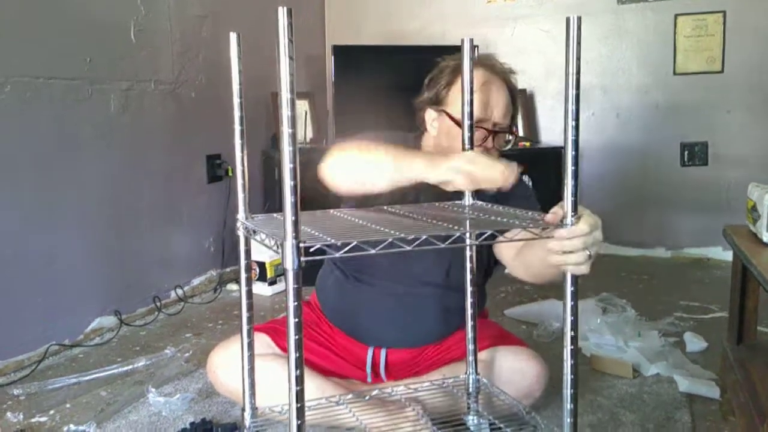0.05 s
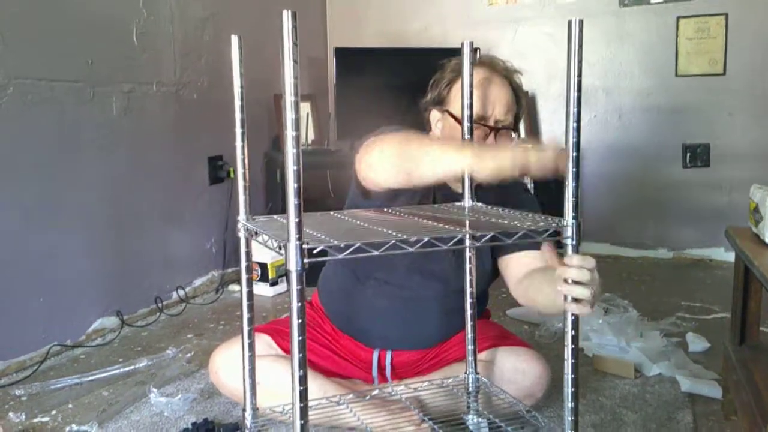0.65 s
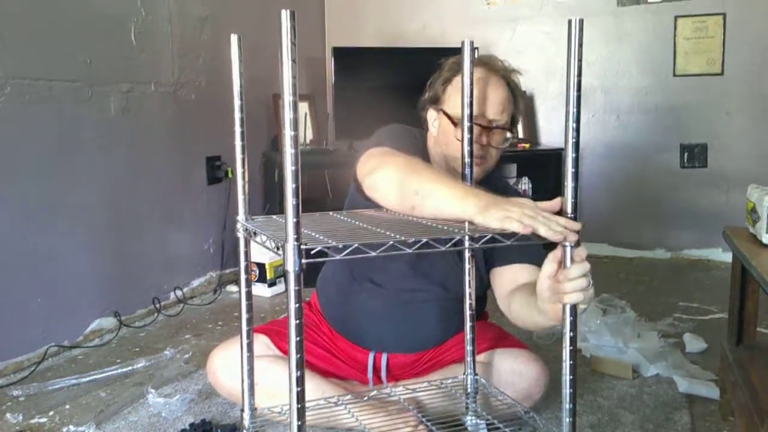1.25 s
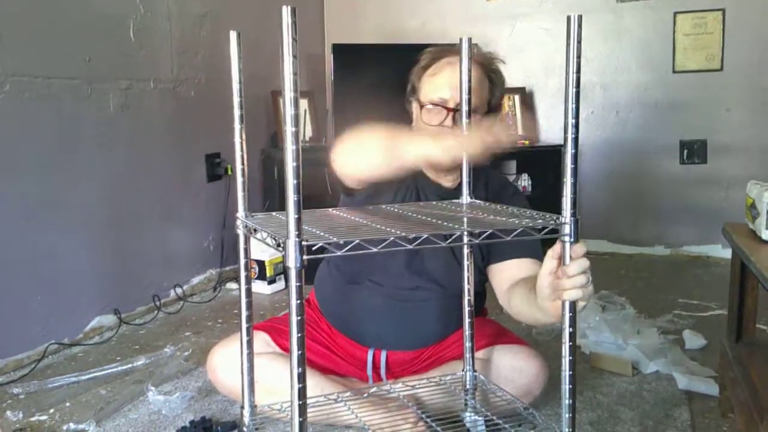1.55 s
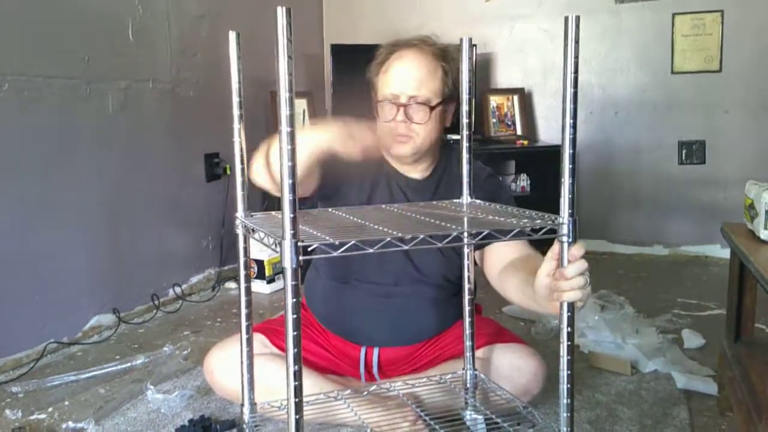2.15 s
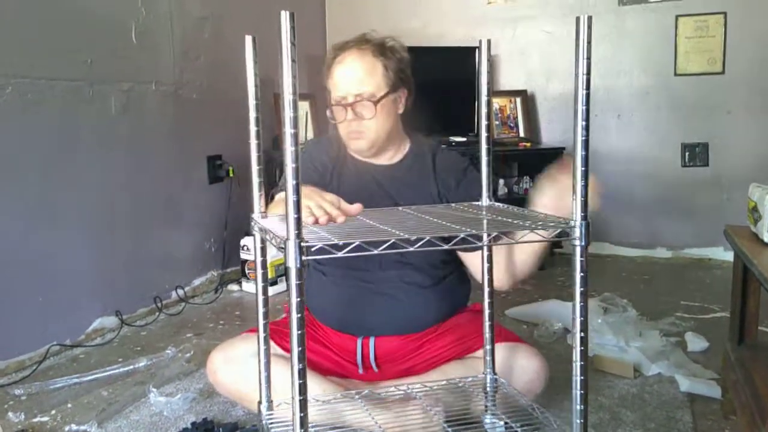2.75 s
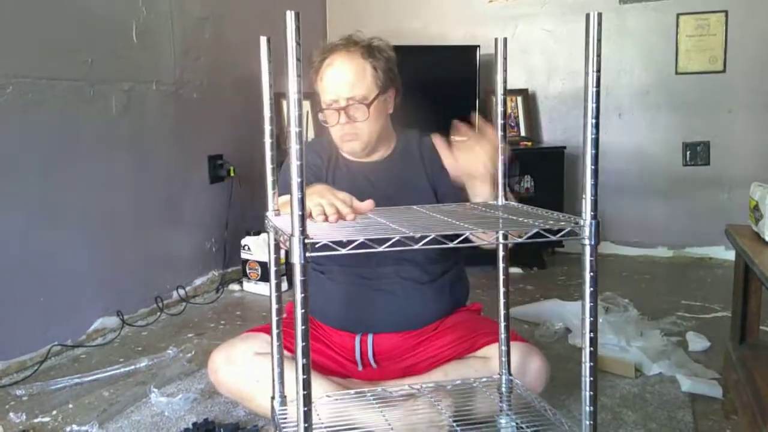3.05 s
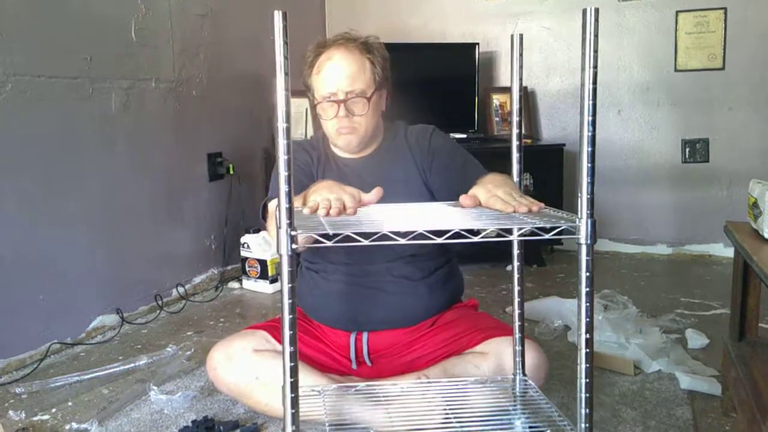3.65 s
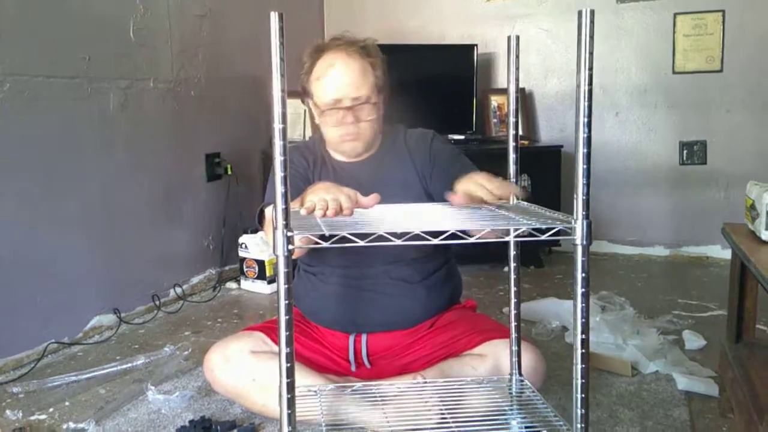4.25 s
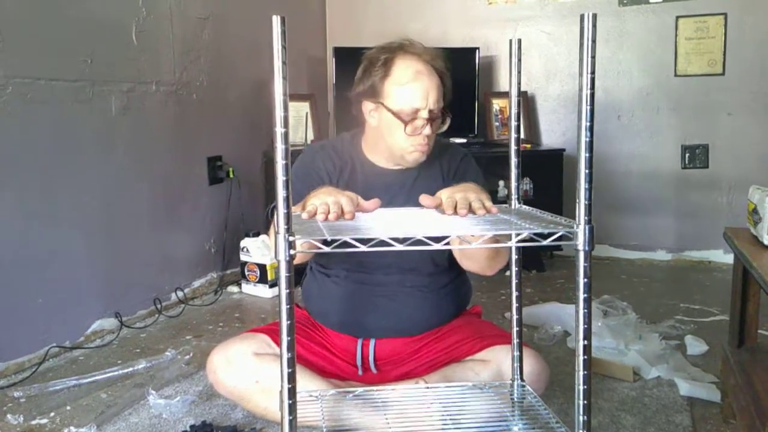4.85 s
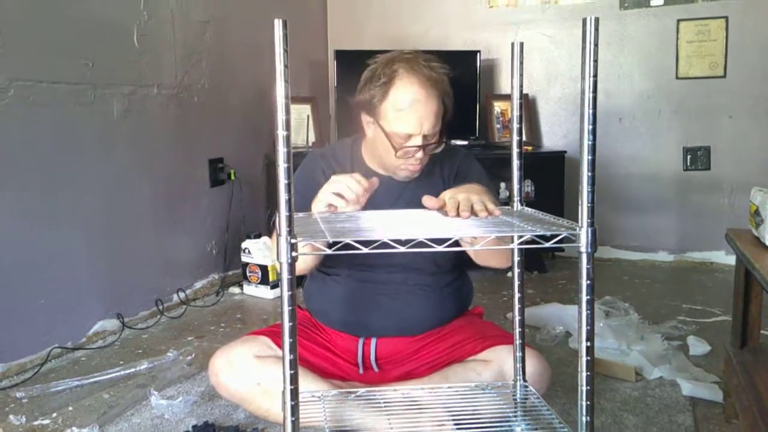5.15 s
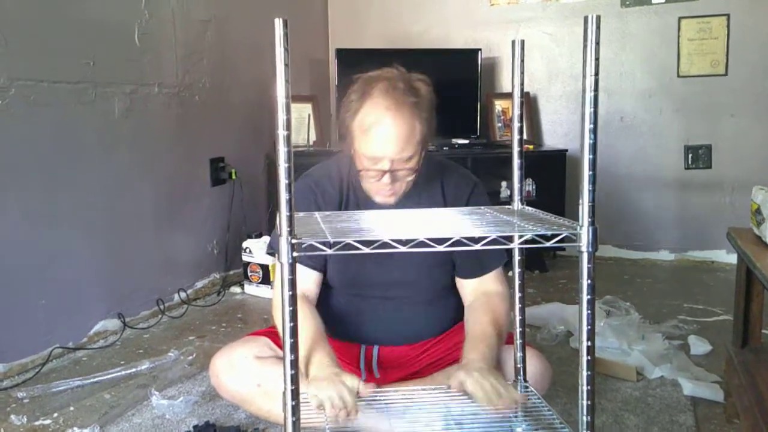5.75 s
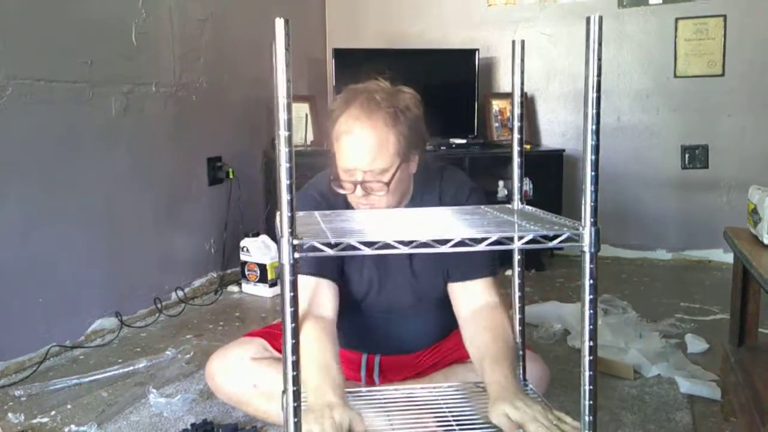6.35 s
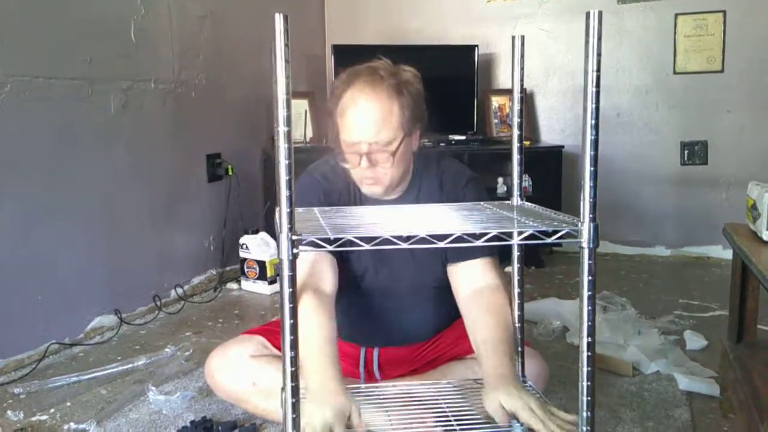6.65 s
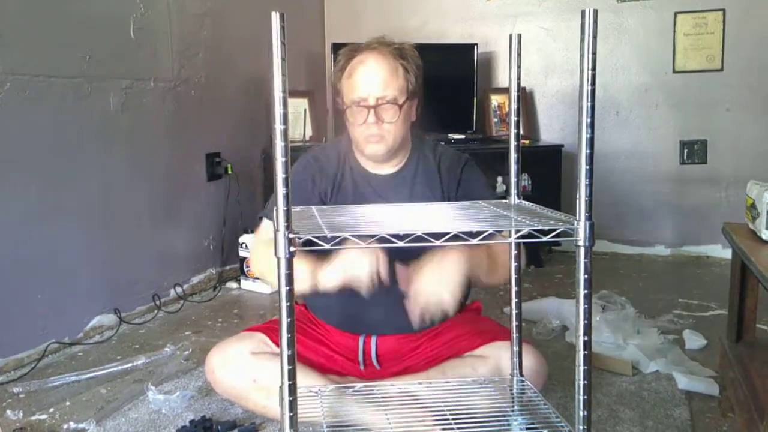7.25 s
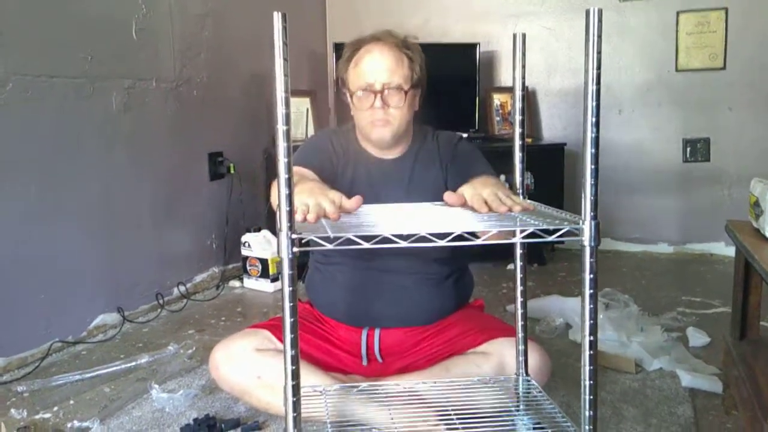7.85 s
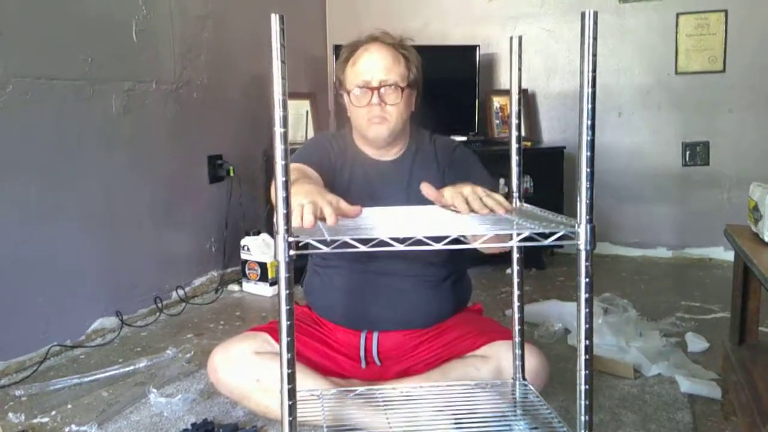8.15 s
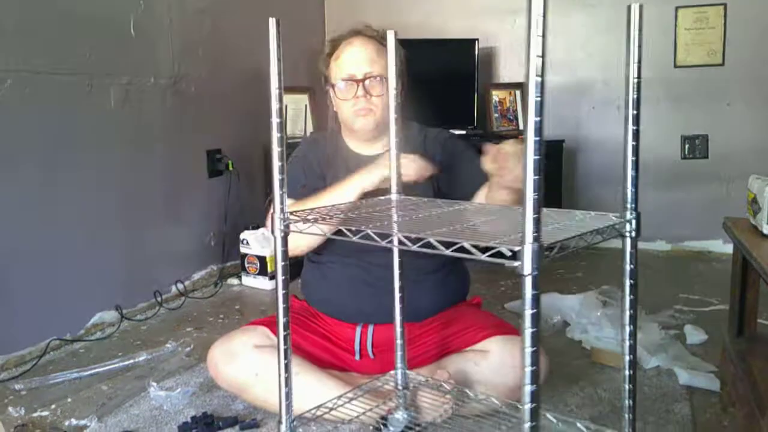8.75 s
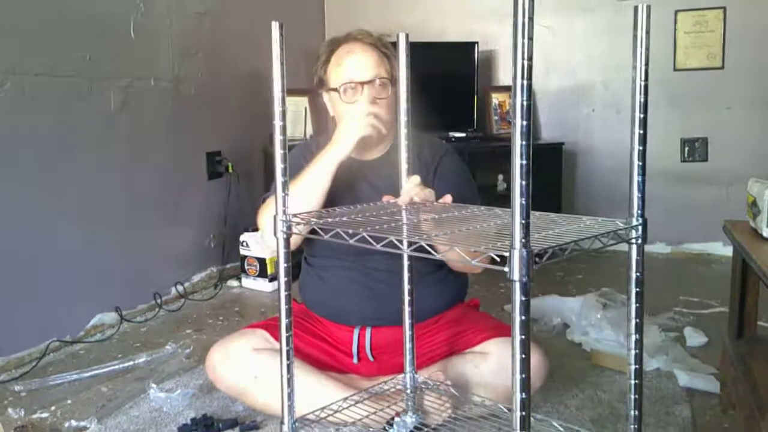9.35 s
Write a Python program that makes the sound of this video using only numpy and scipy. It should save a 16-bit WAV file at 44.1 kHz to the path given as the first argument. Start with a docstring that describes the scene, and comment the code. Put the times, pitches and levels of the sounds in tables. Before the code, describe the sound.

A wire cart is knocked together indoors: soft thuds, bright metallic clinks and lightly ringing poles, with small ticks between.

```python
"""Slaps and bright clinks: a chrome wire cart is being put together in a living room.
Palms knock the shelves down onto their poles, the collars chatter in their seats, the mesh clatters,
the poles clang and the free wires sing on faintly. Soft ticks, squeaks and scrapes fall in between.
A small band-limited microphone hears it from across the floor, over steady room noise."""
import sys
import numpy as np
from scipy import signal
from scipy.fft import rfft, irfft, next_fast_len
from scipy.io import wavfile

SR = 44100
rng = np.random.default_rng(int(sys.argv[2]) if len(sys.argv) > 2 else 0)


def put_to_file(sound):
    """Save the sound as 16-bit audio at rate SR, in the file named by the first command-line argument."""
    columns = np.atleast_2d(sound).T  # one column per channel
    safe = np.clip(columns, -1, 1)
    whole_steps = np.round(safe * 32767)
    wavfile.write(sys.argv[1], SR, whole_steps.astype(np.int16))


N = 414540
T = np.arange(SR) / SR  # the one second that each event lives in
EARLY = int(.08 * SR)  # the attack of a blow, in samples

# The slaps and clinks. Each row: start in seconds, level in dB, frame thud and metal clink in dB against
# that level, crack over tail in dB, pole ring over mesh clatter in dB, wire sing against the clink in dB,
# then three resonances in Hz that the contact point favours.
BLOWS = [(-0.12, -45.5, -12, -5.5, -8, -10, -9, 910, 1810, 5600),
         (0.231, -52, 1, -14, 7, -10.5, -13, 477, 790, 1000),
         (0.483, -49, -15, -1, 12.5, -4, -11, 1260, 1835, 6800),
         (0.564, -60, -10, 2.5, 5, 2, -22, 1860, 5830, 6600),
         (0.603, -57, -12.5, 2, 7.5, 5, -18, 4780, 5330, 5900),
         (0.814, -48.5, 7, -14.5, 8.5, -8, -10, 152.4, 505, 1396),
         (0.956, -58.5, -11, 2.5, 10, 7, -16, 4800, 5900, 6640),
         (1.774, -45, 4, -15.5, 4, -9.5, -16, 219, 790, 2950),
         (2.295, -46.5, 6, -11.5, 0.5, -13, -20, 150, 1030, 1980),
         (3.09, -50, 1, 5.5, -2, 0, -11, 616, 886, 6700),
         (4.308, -45.5, -9, -0.5, -6, 2.5, -24, 1444, 1825, 2020),
         (5.746, -40.5, -4, 0, 4.5, -8, -14, 1404, 5130, 5700),
         (6.319, -42, 7.5, -4, 6, -5, -15.5, 241, 600, 7920),
         (6.869, -43, 2.5, -4, 0, -11, -15.5, 490, 2820, 5700),
         (7.61, -37.5, -6, -2.5, -12, -3, -12, 910, 2717, 6480),
         (9.215, -44, -20.5, -0.5, -2, -3.5, -9.5, 930, 2480, 5000)]
def shelf_blows(out):
    """Seat the shelves: a soft palm gives a thud, bare metal a bright clink that rings the poles."""
    for start, db, thud_db, clink_db, crack_db, ring_db, sing_db, *favoured_hz in BLOWS:
        energy = contacts()
        clatter = mesh_clatter(envelope(energy, crack_db, t60=0.4))
        clang = pole_clang(envelope(energy, crack_db, t60=0.316), favoured_hz)
        hit = absorb_treble(clatter) + undb(ring_db) * clang
        hit = band(hit, 100, SR / 4)  # the open frame radiates little deep bass
        hit = cart_body(hit, favoured_hz)
        hit = balance(hit, np.array([thud_db, 0, clink_db]))
        add(out, start, undb(db) * (hit + wire_hum(thud_db) + wire_sing(clink_db + sing_db)))


def contacts(chatter_db=-17, chatter_s=0.057, chatters=8, rebound_s=0.029, rebound_db=-8.5):
    """Energy of one blow: first contact, dying chatter in the collars, two ever weaker rebounds."""
    energy = np.zeros(len(T))
    energy[0] = 1
    lateness = rng.random(chatters)
    np.add.at(energy, (chatter_s * lateness * SR).astype(int), undb(chatter_db) ** 2 * (1 - lateness))
    for bounce in (1, 2):
        energy[int(bounce * rebound_s * SR)] += undb(bounce * rebound_db) ** 2
    return energy


def envelope(energy, crack_db, t60, crack_t60=0.053, rise_s=0.0041):
    """Each contact gives a crack and a longer tail; the first reflections build up over a few ms."""
    decay = fade(t60) ** 2 + (undb(crack_db) * fade(crack_t60)) ** 2
    rise = 1 - np.exp(-T / rise_s)
    return np.sqrt(np.abs(drive(energy, decay * rise)))


def mesh_clatter(shape, grain_db=1.5, grain_samples=40):
    """Countless welded wires clatter, dense and grainy."""
    steps = rng.standard_normal(len(T) // grain_samples + 1)
    grain = undb(grain_db * np.repeat(steps, grain_samples)[:len(T)])
    return unit(shape * grain * rng.standard_normal(len(T)))


def absorb_treble(x, split_hz=3200, treble_t60=0.4):
    """Hands and furnishings soak up the treble of the clatter sooner than the rest."""
    dull = signal.sosfilt(signal.butter(1, split_hz, fs=SR, output="sos"), x)
    return dull + (x - dull) * fade(treble_t60)


# Poles and shelf rim, in clusters of near-equal modes. Each row: centre in Hz, width in Hz, level in dB.
POLE_MODES = [(148.2, 11, -0.5), (214.6, 12, -6), (496, 38, -5), (607, 24, -7), (695, 39, 3.5),
              (797, 44, -4), (919, 22, -3), (1016, 25, -2.5), (1291, 39, -0.5), (1446, 87, 1),
              (1575, 77, -9), (1790, 77, -2.5), (2020, 41, -2.5), (2412, 76, -1), (2643, 46, -1),
              (2840, 50, -5), (3053, 110, -5), (3535, 340, 4.5), (4770, 150, -2), (5054, 90, -5),
              (5270, 140, -4), (5794, 69, 0), (5933, 60, -2), (6320, 120, -3.5), (6570, 91, -3),
              (6717, 110, 3.5), (6975, 190, 7), (7570, 83, 1), (7980, 140, 2), (7460, 290, 7.5)]
def pole_clang(shape, favoured_hz, favour_db=11, reach=0.029, size=2 ** 14):
    """Mode clusters beat as they fade; the contact point favours some and stirs the rest by chance."""
    freqs = np.fft.rfftfreq(size, 1 / SR)
    partials = rfft(rng.standard_normal(size))
    chance_db = 3 * rng.standard_normal(len(POLE_MODES)).clip(-2, 1.3)
    out = np.zeros(len(T))
    for (hz, width, db), stray_db in zip(POLE_MODES, chance_db):
        favour = np.max(np.exp(-(np.log(hz / np.array(favoured_hz)) / reach) ** 2))
        cluster = irfft(partials / (1 + (2 * (freqs - hz) / width) ** 2))
        gain = undb(db + favour_db * favour + stray_db * (1 - favour))
        out[:size] += gain * unit(cluster * shape[:size])
    return unit(out)


# The tone the struck cart radiates. Each row: frequency in Hz, gain in dB.
CART_TONE = [(100, 0), (200, 0), (450, 1.5), (900, -2), (1550, -4), (2800, -3), (4000, -6.5), (6300, -5.5),
             (8000, -9)]
def cart_body(hit, favoured_hz, lift_db=2.5, lift_octaves=0.26):
    """The cart colours the hit, and the contact point lifts it round the favoured resonances."""
    hz = np.geomspace(60, 10000, 80)
    cart_hz, cart_db = np.transpose(CART_TONE)
    body_db = np.interp(np.log(hz), np.log(cart_hz), cart_db)
    octaves_away = np.log2(hz[:, None] / np.array(favoured_hz))
    nearness = np.exp(-(octaves_away / lift_octaves) ** 2).max(axis=1)
    return colour(hit, hz, body_db + lift_db * nearness)


# Four edges in Hz round three registers: thud of the frame, clank of the shelf, clink of the collars.
REGISTER_EDGES = [60, 750, 3700, 8400]
def balance(hit, register_db):
    """Tilt a hit smoothly, in three passes, so that each register starts near its level."""
    edges = np.array(REGISTER_EDGES)
    centres = np.sqrt(edges[:-1] * edges[1:])
    bins = np.round(edges * EARLY / SR).astype(int)
    for _ in range(3):
        power = 2 * np.abs(rfft(hit[:EARLY]) / EARLY) ** 2
        attack_db = 10 * np.log10(np.add.reduceat(power, bins)[:-1])
        hit = colour(hit, centres, register_db - attack_db)
    return hit


# Slow bending of the free wires. Each row: pitch in Hz, relative level in dB, T60 in seconds.
BENDING_MODES = [(577, -31, 1.8), (698, -19.5, 4.2), (768, -20, 3.6), (797, -24, 2.6), (862, -22, 3.1),
                 (896, -20.5, 1.7), (1822, -16, 1.16), (1856, -17.5, 1.1), (2280, -23.5, 1.6),
                 (2330, -23.5, 1.7), (2390, -26, 0.92), (2560, -25, 1.4), (2660, -27, 0.99)]
def wire_hum(thud_db, level_db=-3):
    """The free wires hum on after the clatter; low modes follow the thud, high ones the clank."""
    pitches = [hz for hz, *_ in BENDING_MODES]
    follow_db = np.interp(np.log(pitches), np.log([350, 1600]), [thud_db, 0])
    return ring_wires(BENDING_MODES, level_db + follow_db)


# The short spans between welds. Each row: pitch in Hz, relative level in dB, T60 in seconds.
SPAN_MODES = [(4564, -6, 1.2), (4580, -1.5, 0.82), (4680, -3.5, 0.91), (4610, -3, 0.99), (4700, -6, 0.69),
              (4750, -3, 0.38)]
def wire_sing(level_db):
    """The short spans all ring near one high pitch and shimmer against each other."""
    return ring_wires(SPAN_MODES, [level_db] * len(SPAN_MODES))


def ring_wires(modes, gains_db, detune=.0007, attack_s=.004, release_s=.1):
    """Wires swing up and die away as sines; each blow finds wires of slightly different pitch."""
    out = np.zeros(len(T))
    for (hz, db, t60), gain_db in zip(modes, gains_db):
        pitch = hz * (1 + detune * rng.standard_normal())
        out += undb(db + gain_db) * fade(t60) * np.sin(2 * np.pi * (pitch * T + rng.random()))
    return out * np.minimum(T / attack_s, 1) * np.minimum((T[-1] - T) / release_s, 1)


# Soft ticks, brief squeaks and faint scrapes of the cart.
# Each row: start in seconds, length in seconds, centre in Hz, width in Hz, dry level in dB.
SMALL_NOISES = [(.289, 0.0043, 1280, 1200, -51), (.385, 0.01, 2800, 1200, -67),
                (.885, 0.02, 3080, 900, -61), (1.801, 0.016, 2900, 220, -52.5),
                (1.828, 0.0065, 2900, 220, -60), (1.848, 0.0025, 2680, 500, -45),
                (6.648, 0.059, 6300, 3000, -68), (8.148, 0.0073, 1090, 1190, -57),
                (8.378, 0.1, 910, 900, -61)]
def ticks_and_scrapes(out, grains_per_s=900):
    """Each tick, squeak or scrape is a short burst of grainy, band-passed noise."""
    for start, length, hz, width, db in SMALL_NOISES:
        grains = (rng.random(len(T)) < grains_per_s / SR) * rng.standard_normal(len(T))
        hiss = 0.074 * rng.standard_normal(len(T))
        swell = np.sin(np.pi * np.minimum(T / length, 1))
        burst = band((grains + hiss) * swell, hz - width / 2, hz + width / 2, order=2)
        add(out, start, undb(db) * room(unit(burst) * np.sqrt(length * SR)))


def room(x, wet_db=-4, t60=0.21):
    """Direct sound plus the short diffuse tail of the living room."""
    tail = unit(rng.standard_normal(len(T)) * fade(t60))
    return x + undb(wet_db) * drive(x, tail)


# The colour of the room noise. Each row: frequency in Hz, relative noise density in dB.
ROOM_TONE = [(15, -37), (25, -3.5), (69, -4.5), (112, 0.5), (227, -2), (262, -3.5), (282, -5.5), (343, -1),
             (378, -5.5), (675, -11), (762, -12), (2560, -19), (5170, -29.5), (6920, -22.5), (8200, -30.5),
             (10700, -68), (18000, -120)]
def room_tone(level_db=-57, waver_db=0.85, waver_points=90):
    """A steady bed of room noise whose low end wavers slightly."""
    noise = colour(rng.standard_normal(N), *np.transpose(ROOM_TONE))
    noise = signal.sosfilt(signal.butter(4, 10000, fs=SR, output="sos"), noise)
    waver = np.interp(np.arange(N), np.linspace(0, N, waver_points), rng.standard_normal(waver_points))
    lows = colour(noise, [400, 1500], [0, -30])
    noise += (undb(waver_db * waver) - 1) * lows
    return undb(level_db) * noise / noise.std()


def undb(db):
    """Decibels to gain."""
    return 10 ** (np.asarray(db) / 20)


def fade(t60):
    """Decay by 60 dB in t60 seconds."""
    return np.exp(-np.log(1000) * T / t60)


def unit(x):
    """Scale to unit energy."""
    return x / np.sqrt(np.sum(x ** 2))


def colour(x, hz, db):
    """EQ along a curve drawn through points in Hz and dB."""
    size = next_fast_len(len(x) + EARLY)
    freqs = np.maximum(np.fft.rfftfreq(size, 1 / SR), 1)
    gain = undb(np.interp(np.log(freqs), np.log(hz), db))
    return irfft(rfft(x, size) * gain, size)[:len(x)]


def band(x, low_hz, high_hz, order=3):
    """Causal band-pass."""
    return signal.sosfilt(signal.butter(order, [low_hz, high_hz], "band", fs=SR, output="sos"), x)


def drive(x, response):
    """Play x through an impulse response."""
    return signal.fftconvolve(x, response)[:len(T)]


def add(out, start_s, x):
    """Mix x in at start_s, trimming what falls outside the scene."""
    i = int(start_s * SR)
    x = x[max(-i, 0):N - i]
    out[max(i, 0):max(i, 0) + len(x)] += x


def scene():
    """Blows, ticks and scrapes over the room tone, in mono."""
    out = room_tone()
    shelf_blows(out)
    ticks_and_scrapes(out)
    return out[None]


def record(dry, top_hz=8550):
    """The small microphone cuts off the top of the treble."""
    taps = signal.firwin(151, top_hz, window=("kaiser", 7), fs=SR)
    return signal.fftconvolve(dry, taps[None], "same", axes=1)


dry = scene()
out = record(dry)
put_to_file(out)
```